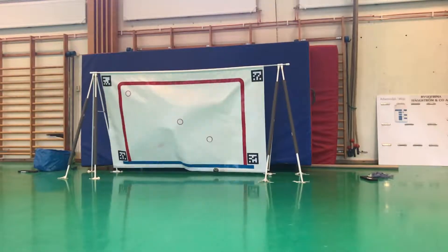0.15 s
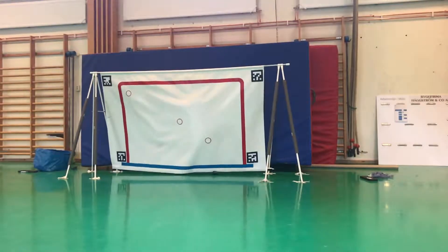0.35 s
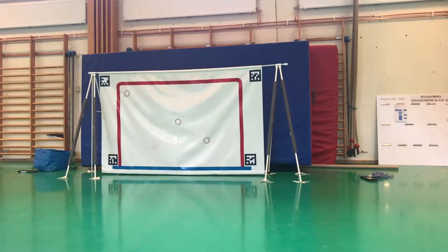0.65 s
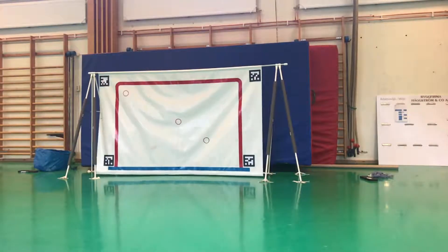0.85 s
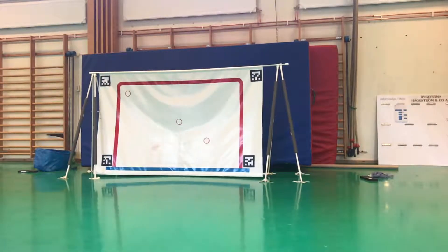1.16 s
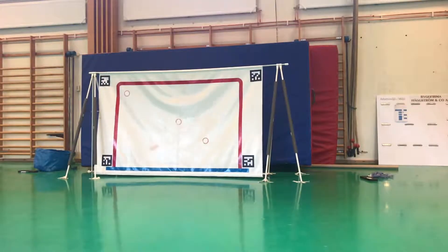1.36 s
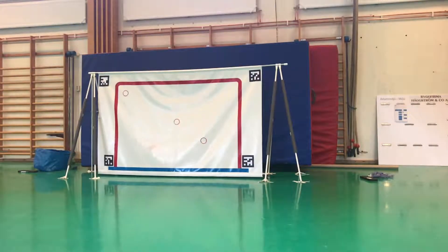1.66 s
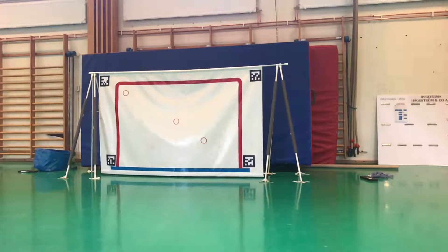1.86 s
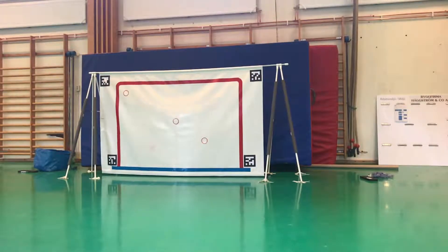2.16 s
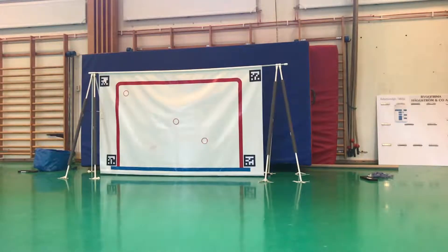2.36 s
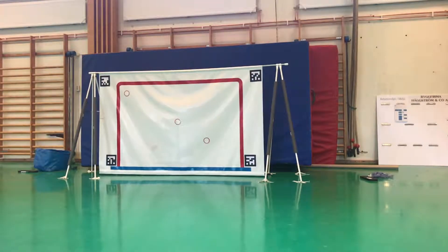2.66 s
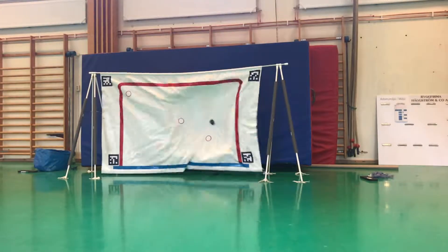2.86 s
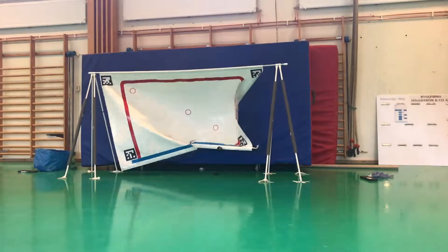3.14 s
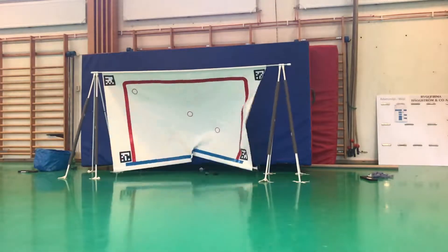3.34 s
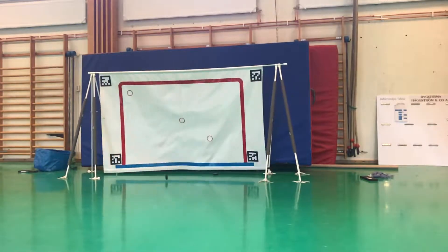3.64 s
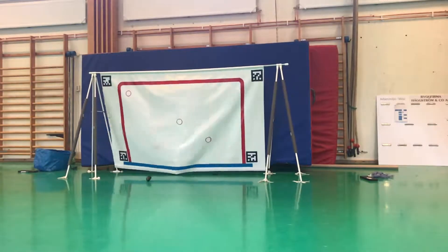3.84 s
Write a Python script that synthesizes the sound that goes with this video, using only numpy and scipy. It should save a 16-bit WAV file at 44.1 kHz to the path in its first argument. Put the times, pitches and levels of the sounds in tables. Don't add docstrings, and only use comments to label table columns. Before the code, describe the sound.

A puck hits a hanging canvas goal with a crack and deep boom. Before it, a thud and metallic clink, echoing stick taps, a brief scrape and shot; afterwards flapping and dull thuds. Distant goal, reverberant gym, microphone nearer the stick.

```python
import sys
import numpy as np
from scipy import signal
from scipy.fft import rfft, irfft
from scipy.io import wavfile

SR = 44100
rng = np.random.default_rng(int(sys.argv[2]) if len(sys.argv) > 2 else 0)


def boost_factor(decibels):
    exponent = np.asarray(decibels, float) / 20
    return 10 ** exponent


def log_audio(samples):
    frames = np.atleast_2d(samples).T
    limited = np.clip(frames, -1, 1)
    pcm = np.round(limited * 32767).astype(np.int16)
    wavfile.write(sys.argv[1], SR, pcm)


N = 176400
SWELL_CYCLES = 2.5


def rms_one(x):
    return x / np.sqrt(np.mean(x ** 2) + 1e-20)


def top_one(x):
    return x / np.abs(x).max()


def at_hz(points, hz):
    points = np.array(points)
    return np.interp(np.log(hz), np.log(points[:, 0]), points[:, 1])


def coloured(x, spectrum):
    gain = boost_factor(at_hz(spectrum, np.fft.rfftfreq(len(x), 1 / SR) + 1))
    return rms_one(irfft(rfft(x) * gain, len(x)))


def drift(rate):
    r = np.exp(-80 * np.pi * rate / SR)
    slow = signal.lfilter([1], [1, -2 * r, r * r], rng.standard_normal(N // 40 + 2002))[2000:]
    return np.interp(np.arange(N) / 40, np.arange(len(slow)), rms_one(slow))


def ring(x, hz, t60):
    r, w = boost_factor(-60 / (t60 * SR)), 2 * np.pi * hz / SR
    return signal.lfilter([0, np.sin(w)], [1, -2 * r * np.cos(w), r * r], x + 1e-18)


def cut(x, hz, kind):
    return signal.sosfilt(signal.butter(2, hz, kind, fs=SR, output="sos"), x)


def burst(rise_s, fall_s, size=8192):
    t = np.arange(size) / SR
    envelope = np.minimum(t / rise_s, 1) * np.exp(-np.maximum(t - rise_s, 0) / fall_s)
    return rng.standard_normal(size) * envelope


def add(out, s, x):
    i = int(s * SR)
    out[i:i + len(x)] += x[:N - i]


def swell(hz):
    turns = np.arange(int(SWELL_CYCLES * SR / hz)) * hz / SR
    return (turns / SWELL_CYCLES) ** 2 * np.sin(2 * np.pi * turns)


def stick():
    # t/s, knock level/dB, knock f/Hz, crack level/dB, floor thump level/dB
    taps = [
        (0.9305, -16.5, 1210, -21.5, -23.5),
        (0.9416, -15, 1680, -24.5, -36),
        (1.074, -21, 1520, -27, -27),
        (1.393, -12, 1360, -16, -18.5),
        (1.412, -26, 1200, -28, -22.5),
        (1.6384, -10.5, 1200, -13, -18.5),
        (1.853, -28, 1733, -37, -35.5),
        (2.6393, -11.5, 1920, -6.5, -18),
        (2.644, -12.5, 1150, -13.5, -12.5),
    ]
    # t/s, level/dB, f/Hz
    touches = [(0.9277, -29, 1500), (0.9337, -28, 1400), (.9445, -33, 1700), (0.9503, -22, 1600),
               (0.961, -30, 1500), (1.078, -24.5, 990), (1.397, -19, 810), (1.405, -30, 1100),
               (1.654, -29, 1100), (1.8539, -23, 1780), (1.6338, -31, 1250), (1.641, -11.5, 1030),
               (1.6434, -28, 800), (1.651, -23, 1140), (1.659, -24, 1600), (2.534, -32, 1310),
               (2.6372, -14, 1700), (2.642, -16, 1270), (2.6472, -16.5, 560), (2.6607, -15, 2200),
               (2.6686, -10.5, 3230), (2.6729, -13, 2240)]
    knock_cycles, touch_cycles, spread_t60_s = 5.0, 4.5, 0.0012
    out, walls, click = np.zeros(N), np.zeros(N), np.eye(1, 8192, 40)[0]
    push = cut(click, 930, "low")
    for s, knock_db, hz, crack_db, thump_db in taps:
        contact = click + 0.19 * burst(0.00039, 0.0031)
        crack = boost_factor(crack_db) * top_one(cut(cut(contact, 1660, "high"), 3330, "low"))
        loaded = np.convolve(click, swell(hz))[:8192]
        knock = cut(ring(loaded, hz, knock_cycles / hz), 420, "high")
        floor = ring(push, 200.0, 0.03) + 1.36 * ring(push, 299, 0.019)
        floor = floor + 1.8 * ring(push, 567, 0.012) + 0.42 * ring(push, 920, 0.012)
        thump = boost_factor(thump_db) * top_one(floor)
        add(out, s - .0009 - SWELL_CYCLES / hz * 0.802, boost_factor(knock_db) * top_one(knock))
        add(out, s - .001, crack)
        broad_knock = boost_factor(knock_db) * top_one(cut(ring(click, hz, spread_t60_s), 484, "high"))
        broad_crack = cut(cut(cut(click, 2100, "high"), 4300, "low"), 7200, "low")
        add(walls, s - .001, broad_knock + boost_factor(crack_db) * broad_crack * 1.72)
        add(walls, s + 0.00395, 0.44 * cut(thump, 180, "high"))
        add(out, s + 0.0012, thump)
        sprung = top_one(ring(ring(push, 76.6, 0.19), 77.4, 0.19))
        add(out, s + 0.013, boost_factor(min(thump_db, -23) - 16.0) * sprung)
    for s, db, hz in touches:
        twice_rung = ring(ring(click, hz, touch_cycles / hz), hz, touch_cycles / hz / 2)
        touch = boost_factor(db) * top_one(cut(twice_rung, 360, "high"))
        add(out, s - .0013, touch)
        add(walls, s - .0013, 0.39 * touch)
    return out, walls


def drag():
    # t/s, level/dB
    pressure = [(2.43, -84), (2.465, -52.5), (2.492, -41), (2.52, -35.5), (2.542, -32), (2.575, -36),
                (2.62, -40.5), (2.674, -32), (2.72, -53)]
    # f/Hz, level/dB
    grit_colour = [(120, -25.5), (200, -13), (579, -25), (647, -12), (1420, -8), (1620, -1.5), (5040, -20),
                   (16000, -35)]
    # f/Hz, width/Hz, level/dB
    blade_modes = [(1400, 35, 3), (5000, 1200, 4), (8630, 700, 8), (12940, 1200, -2)]
    # t/s, f/Hz, level/dB
    song = [(2.45, 598, -74), (2.471, 889, -51), (2.49, 753, -47.5), (2.52, 959, -44), (2.531, 1267, -44),
            (2.541, 1410, -25), (2.553, 1427, -32), (2.57, 1390, -45), (2.62, 1410, -58)]
    grit_per_s, song_width_hz, chatter_db = 4300, 105, 3.2
    t = np.arange(N) / SR
    hits = rng.random(N) < grit_per_s / SR
    grit = hits * boost_factor(2.2 * rng.exponential(1, N)) * rng.choice([-1, 1], N)
    grit = coloured(grit, grit_colour)
    body = grit
    for hz, width, g_db in blade_modes:
        body = body + boost_factor(g_db) * signal.lfilter(*signal.iirpeak(hz, hz / width, fs=SR), grit)
    when, song_hz, song_db = np.transpose(song)
    phase = 2 * np.pi * np.cumsum(np.interp(t, when, song_hz)) / SR
    tone = rms_one(cut(rng.standard_normal(N), song_width_hz, "low")) * np.sin(phase)
    s, db = np.transpose(pressure)
    scrape = rms_one(body) * boost_factor(np.interp(t, s, db, -120, -120) + chatter_db * drift(60))
    return 1.09 * tone * boost_factor(np.interp(t, when, song_db, -120, -120)) + scrape


def impact():
    # f/Hz, level/dB, t60/s
    canvas = [(63.6, -4.5, 0.11), (91.2, 1, 0.12), (132.4, 0, 0.082), (153, -14, 0.14),
              (184.5, -0.5, 0.054), (234, -3, 0.067), (303, -15.5, 0.28), (390, -3, 0.064),
              (486, -10, 0.14), (610, -4.5, 0.054), (1050, -2.5, 0.072)]
    shot_s, crack_db, crack_gap_s, crack_s, boom_db = 2.9665, 2.5, .0006, .0003, -1
    rebound_s, rebound_db, rebound_hz, rebound_t60_s = .0335, -9, 205, 0.039
    out, hit = np.zeros(N), np.zeros(SR)
    hit[:64] = -np.hanning(64)
    for k in range(2):
        crack = burst(.0001, crack_s) - 9.5 * np.eye(1, 8192, 4)[0]
        add(out, shot_s + k * crack_gap_s, boost_factor(crack_db) * top_one(crack))
    slap = ring(ring(np.eye(1, 2048, 4)[0], 1300, 0.0051), 1400, 0.0053)
    add(out, shot_s - .0003, boost_factor(-12) * top_one(slap))
    boom = 0
    for k, (hz, db, t60) in enumerate(canvas):
        boom = boom + boost_factor(db) * ring(hit, hz, t60) * (-1) ** (k // 2)
    add(out, shot_s, boost_factor(boom_db) * top_one(boom))
    rebound = ring(ring(hit, rebound_hz, rebound_t60_s), rebound_hz, rebound_t60_s)
    add(out, shot_s + rebound_s, boost_factor(rebound_db) * top_one(rebound))
    return out


def drops():
    # t/s, thud level/dB, thud f/Hz, slap level/dB
    falls = [(.185, -10, 199, -24.5), (0.209, -19.5, 320, -33), (0.222, -20, 218, -32.5),
             (0.244, -25, 303, -18), (3.215, -43, 198, -34), (3.423, -13, 198, -32), (3.446, -21, 258, -51),
             (3.504, -22, 255, -29.5), (3.538, -30, 352, -32), (3.68, -28, 283, -46),
             (3.85, -22.5, 246, -36)]
    out, push = np.zeros(N), -np.diff(cut(np.eye(1, 8193, 1)[0], 770, "low"))
    for s, thud_db, hz, slap_db in falls:
        thud = ring(push, hz, 0.045) + 0.19 * ring(push, 2.11 * hz, 0.029)
        thud = thud + 0.64 * ring(push, 0.66 * hz, 0.084)
        slap = cut(cut(cut(burst(0.00024, 0.012), 3700, "low"), 3000, "low"), 760, "high")
        add(out, s, boost_factor(thud_db) * top_one(thud) + boost_factor(slap_db) * top_one(slap))
    return out


def snaps():
    # t/s, level/dB, length/s
    buckles = [(0.038, -41.5, 0.026), (.113, -20.5, 0.00093), (0.128, -43.5, 0.003), (0.134, -38, 0.008),
               (0.221, -42, .003), (0.266, -44, .004), (0.247, -31, .002), (2.972, -26, 0.024),
               (2.978, -15.5, 0.002), (2.985, -17.5, 0.0011), (2.988, -20, 0.0064), (3, -17, 0.0012),
               (3.052, -25.5, 0.0028), (3.167, -36, 0.0018), (3.227, -53, 0.012), (3.32, -54, .003),
               (3.334, -57, 0.0084), (3.428, -56, .004), (3.502, -39.5, 0.1), (3.917, -38, .002)]
    out = np.zeros(N)
    for s, db, length in buckles:
        tick = cut(burst(0.00078, length), 1000, "high")
        modes = 0.17 * ring(tick, 8970, 0.0032) + 0.11 * ring(tick, 6370, 0.0043)
        modes = modes + 0.05 * ring(tick, 13000, 0.001)
        add(out, s, boost_factor(db) * top_one(tick + modes))
    return out


def clinks():
    # t/s, level/dB, brightness cut f/Hz, rattle/s, body that rings ("leg" the leg, "bar" the
    strikes = [
        (0.362, -9, 16300, 0.013, "leg"),
        (3.75, -18.5, 3100, 0.012, "bar"),
        (3.923, -18.5, 5230, 0.021, "bar"),
    ]
    # f/Hz, level/dB
    leg = [(2600, 2.5), (3200, 1.5), (5400, -3.5), (7900, 0), (8900, -1), (11400, -2.5)]
    # f/Hz, level/dB
    puck_modes = [(1320, -2), (2250, -2.5), (3200, -5), (4100, -8), (7100, -29)]
    # f/Hz, level/dB, t60/s
    leg_ring = [(2530, -6, .2), (3146, -3, .15), (3813, -9, .2), (4022, -7.5, .2), (5300, -10, .2),
                (7019, -7.5, .2), (7740, -6, .25), (8088, -4.5, .3), (8164, -4.5, .3), (9060, -9, .3),
                (11250, -5.5, 0.27), (13040, -13, .2)]
    leg_t60_s, puck_t60_s, leg_ring_db = .0022, .0018, -34
    out = np.zeros(N)
    for s, db, cut_hz, rattle, part in strikes:
        modes, t60, tick = (leg, leg_t60_s, 5.0) if part == "leg" else (puck_modes, puck_t60_s, 1.5)
        contact = cut(burst(0.000094, rattle) + tick * np.eye(1, 8192, 8)[0], cut_hz, "low")
        tube = sum(boost_factor(g_db) * ring(contact, hz, t60) * (-1) ** k for k, (hz, g_db) in enumerate(modes))
        metal = 1.27 * top_one(cut(tube, 1200, "high"))
        add(out, s, boost_factor(db) * (metal + 0.39 * top_one(cut(contact, 764, "high"))))
    strike = np.eye(1, SR, 8)[0]
    after = sum(boost_factor(db) * ring(strike, hz, np.clip(t60, .05, .6)) for hz, db, t60 in leg_ring)
    add(out, strikes[0][0], boost_factor(leg_ring_db) * top_one(after))
    return out


def flapping():
    # t/s, level/dB
    swing_points = [(0., -42), (.1, -35.5), (.17, -42.5), (.3, -33), (.6, -39), (.9, -60.5), (1.4, -64),
                    (2.9, -73), (2.974, -23), (3.05, -23), (3.2, -31.5), (3.4, -37.5), (3.55, -34.5),
                    (3.75, -44), (4., -42)]
    # f/Hz, level/dB per Hz
    rumble_colour = [(18, -36), (30, -6.5), (92, -7.5), (154, -11.5), (311, -12), (845, -27.5),
                     (2000, -89.5), (2600, -72), (4400, -120)]
    # f/Hz, level/dB
    rustle_colour = [(590, -23), (1000, -3.5), (1380, -10), (1570, -9), (6180, -24), (16000, -42.5)]
    flap_db, lump_db, lump_hz = 0.5, 1.2, 20.6
    rustle_db, rustle_follows, flutter_db, flutter_hz = -50.5, 0.5, 2.0, 14
    s, db = np.transpose(swing_points)
    swing = np.interp(np.arange(N) / SR, s, db)
    rumble_level = boost_factor(swing + flap_db + lump_db * drift(lump_hz))
    rumble = rumble_level * coloured(rng.standard_normal(N), rumble_colour)
    hits = rng.random(N) < 3000 / SR
    grains = hits * boost_factor(1.8 * np.minimum(rng.exponential(1, N), 4.0)) * rng.choice([-1, 1], N)
    rustle_level = boost_factor(rustle_db + rustle_follows * (swing + 42.5) + flutter_db * drift(flutter_hz))
    return rumble + rustle_level * coloured(grains, rustle_colour)


def slaps():
    # t/s, level/dB, f/Hz
    returns = [(0.964, -19.5, 1450), (.971, -28, 1900), (.993, -32, 2020), (1.104, -21.5, 1759),
               (1.407, -26, 1300), (1.42, -22, 1350), (1.428, -22.5, 1574), (1.446, -26, 2000),
               (1.463, -25, 1100), (1.6, -22.5, 1100), (1.671, -24, 1050), (1.688, -18.5, 2180),
               (1.693, -22, 1300), (1.704, -25, 1200), (2.664, -18, 1700), (2.672, -12.5, 2000),
               (2.676, -20, 1600), (2.686, -20, 1700)]
    slap_s, half_width = .0025, 2 ** .7
    out = np.zeros(N)
    for s, db, hz in returns:
        smear = cut(burst(0.0012, slap_s), 4100, "low")
        smear = cut(cut(smear, hz * half_width, "low"), hz / half_width, "high")
        add(out, s, boost_factor(db) * top_one(smear))
    return out


def echoes():
    # delay t/s, level/dB, spread/s, cut f/Hz
    reflections = [
        (.023, -18.5, 0.0018, 4260),
        (.056, -24, 0.013, 4020),
    ]
    out = np.zeros(N)
    for delay, db, spread, cut_hz in reflections:
        smear = cut(burst(0.00016, spread / 2), cut_hz, "low")
        add(out, delay, boost_factor(db) * smear / np.sqrt(np.sum(cut(smear, 2200, "low") ** 2)))
    return out[:SR // 2]


def hall_tail():
    # f/Hz, t60/s
    hall_t60 = [(60, 1.04), (200, 1.03), (500, 0.72), (1100, 1.277), (2900, 1.333), (6000, 0.98),
                (12000, 0.53)]
    # f/Hz, level/dB
    hall_colour = [(60, 2), (200, 0), (500, -2.5), (1100, -1), (2900, 2), (6000, -1), (12000, 4)]
    build_s = .035
    t, out = np.arange(2 * SR) / SR, 0
    edges = 30 * 2 ** np.arange(0, 9.6, .5)
    white = rng.standard_normal((2, len(t)))
    for k, (low, high) in enumerate(zip(edges, edges[1:])):
        hz = np.sqrt(low * high)
        band = signal.sosfilt(signal.butter(2, [low, high], "band", fs=SR, output="sos"), white[k % 2])
        out = out + band * boost_factor(at_hz(hall_colour, hz) - 60 * t / at_hz(hall_t60, hz))
    out = out * np.clip((t - .012) / build_s, 0, 1)
    return out / np.sqrt(np.sum(out ** 2))


def ventilation():
    # f/Hz, level/dB
    hum_colour = [(15, -29.5), (25, 4.5), (61, 3), (120, -12.5), (363, -17.5), (394, -27), (560, -17.5),
                  (1610, -24.5), (16000, -46)]
    return boost_factor(-56.5) * coloured(rng.standard_normal(N), hum_colour)


def scene():
    stick_hall_db, drag_hall_db, boom_hall_db, cloth_hall_db, metal_hall_db = 3.5, -1, -9.5, -8.5, -5
    taps, walls = stick()
    blade = drag()
    boom = impact() + drops()
    cloth = snaps()
    metal = clinks()
    dull_boom = cut(boom, 6000, "low")
    send = boost_factor(stick_hall_db) * walls + boost_factor(drag_hall_db) * cut(blade, 7600, "low")
    send = send + boost_factor(boom_hall_db) * dull_boom + boost_factor(cloth_hall_db) * cloth + boost_factor(metal_hall_db) * metal
    wet = signal.fftconvolve(send, hall_tail())[:N] + slaps()
    wet = wet + signal.fftconvolve(dull_boom + cloth + metal, echoes())[:N]
    return (taps + blade + boom + cloth + metal + wet + flapping() + ventilation())[None]


def low_pass(x):
    return signal.sosfilt(signal.butter(12, 17110, fs=SR, output="sos"), x)


def record(dry):
    low_hz, top_hz, ceiling = 49.3, 16600, .74
    bass_cut = cut(dry, low_hz, "high")
    heard = signal.sosfilt(signal.cheby2(10, 60, top_hz, fs=SR, output="sos"), bass_cut)
    limited = heard / (1 + (heard / ceiling) ** 6) ** (1 / 6)
    return low_pass(limited)


dry = scene()
out = record(dry)
log_audio(out)
```